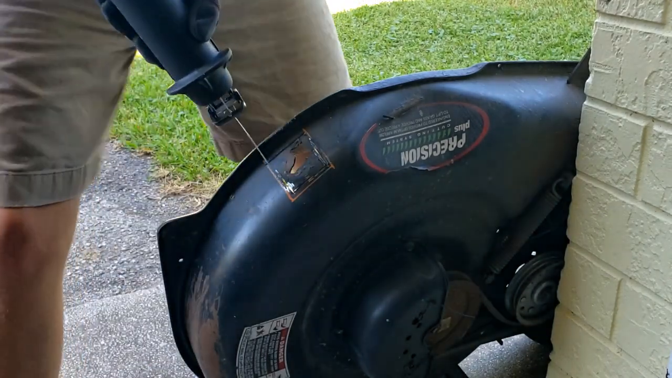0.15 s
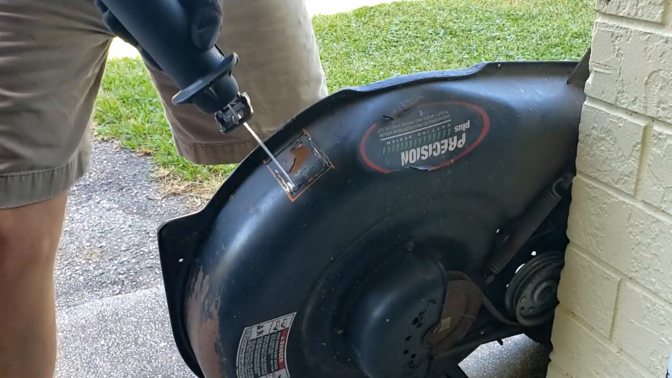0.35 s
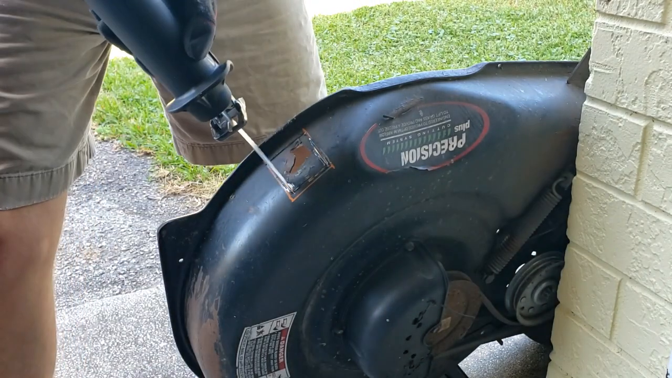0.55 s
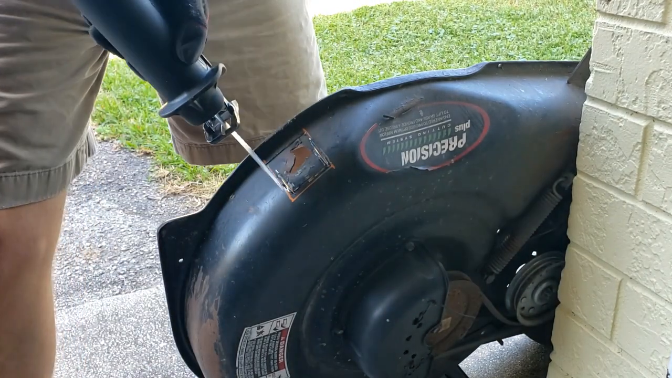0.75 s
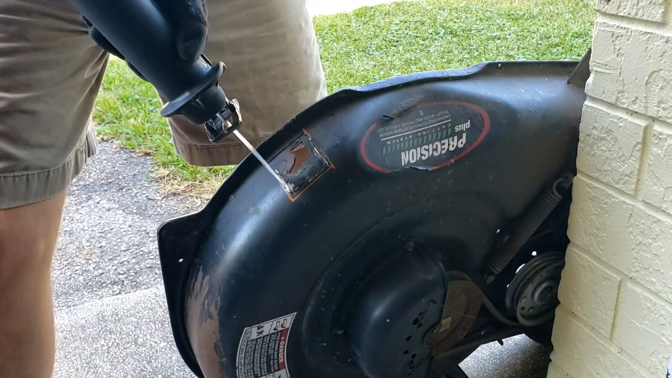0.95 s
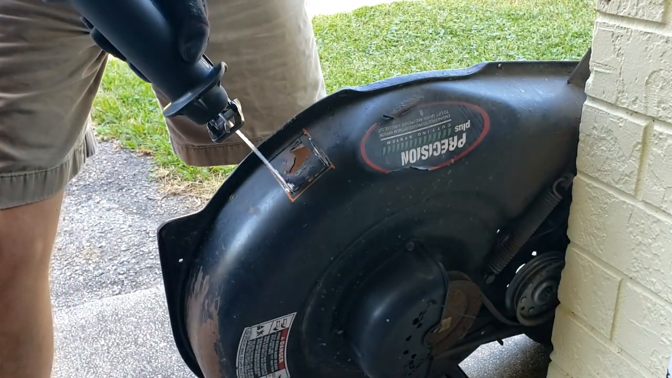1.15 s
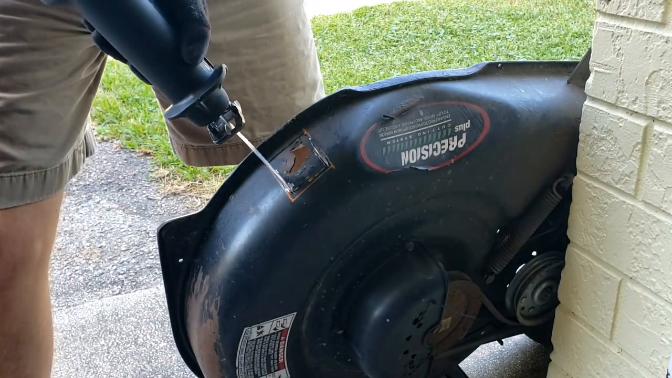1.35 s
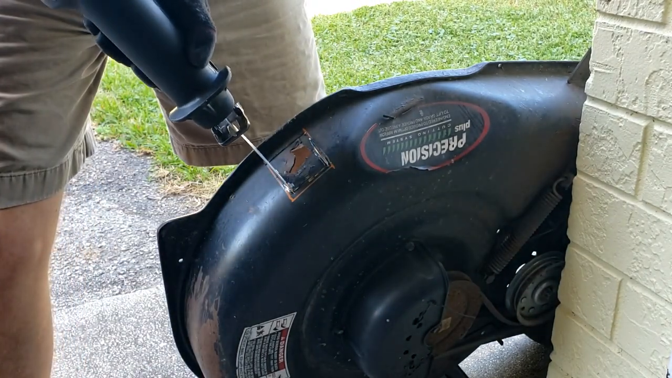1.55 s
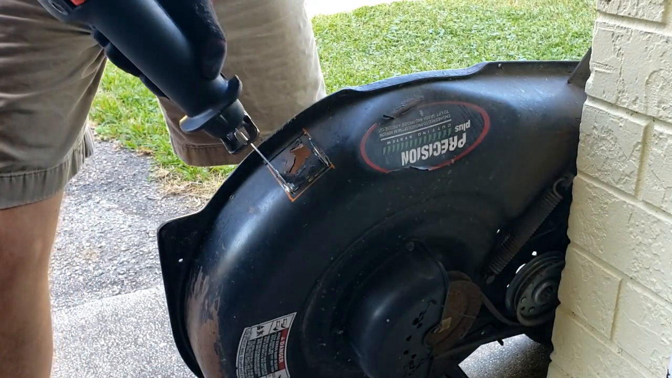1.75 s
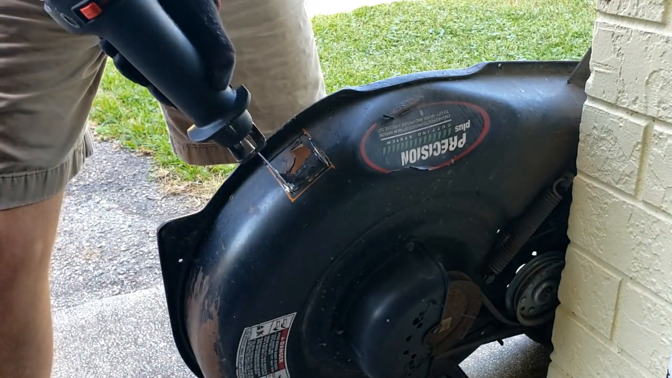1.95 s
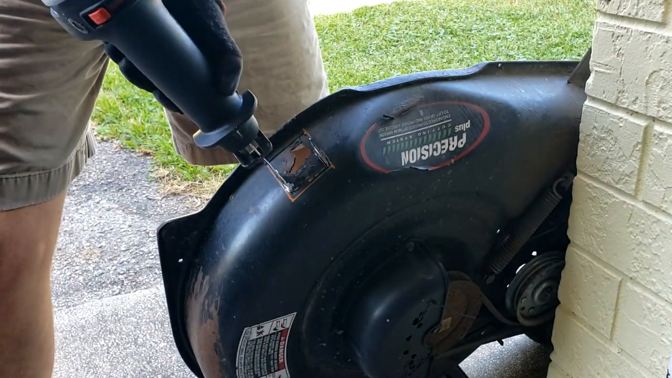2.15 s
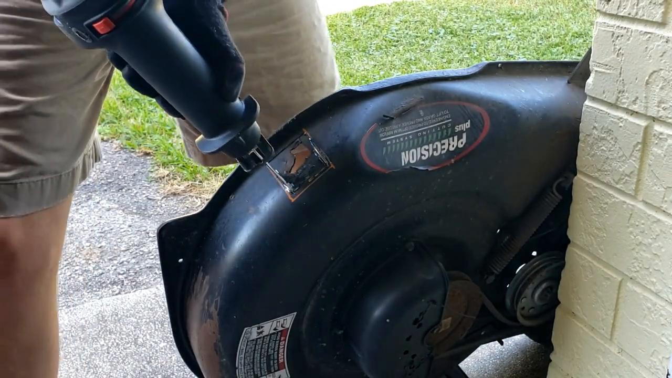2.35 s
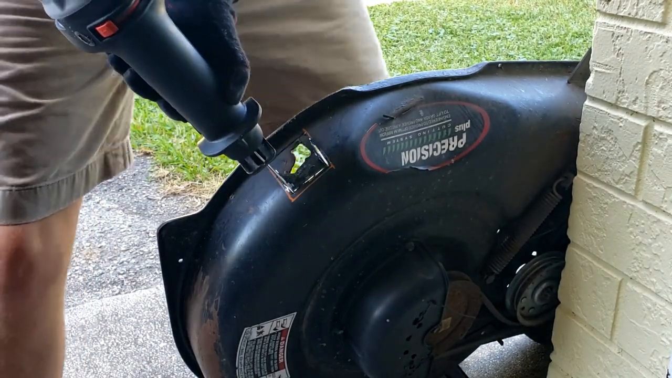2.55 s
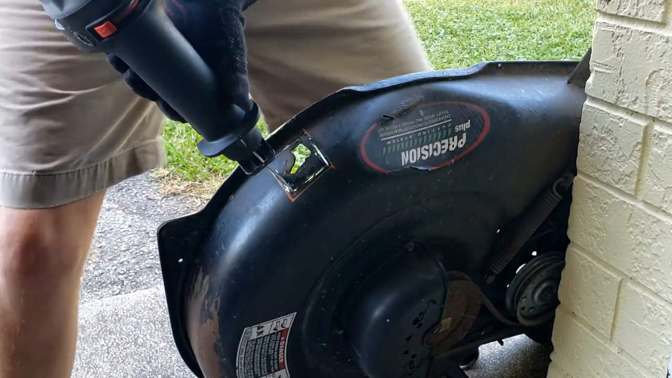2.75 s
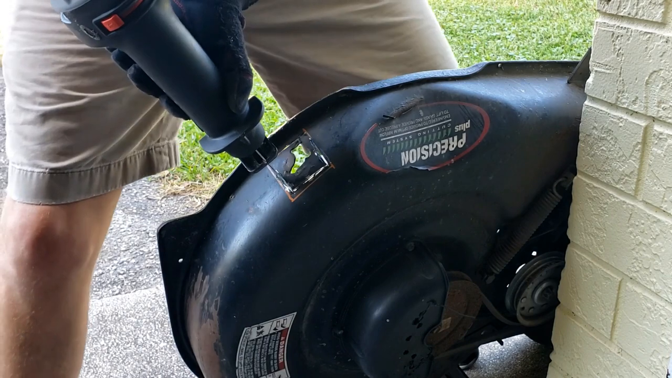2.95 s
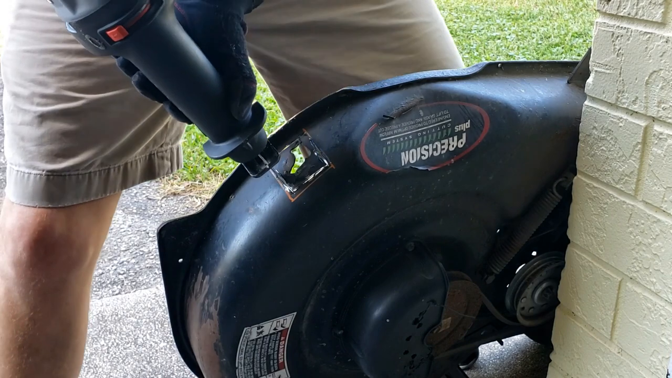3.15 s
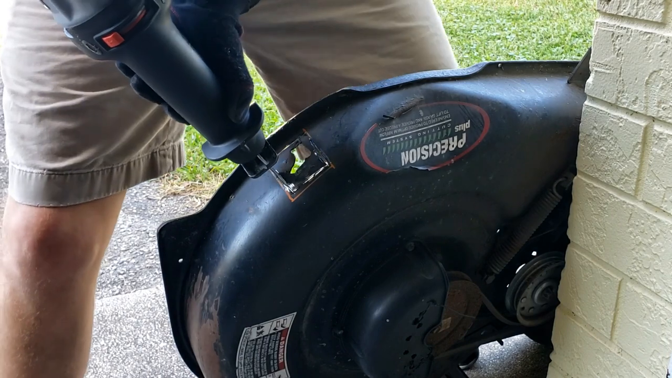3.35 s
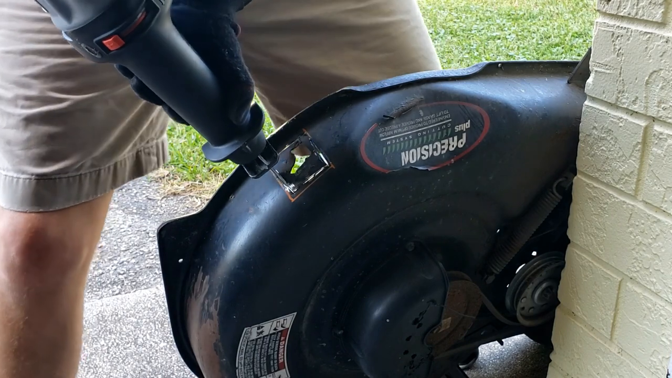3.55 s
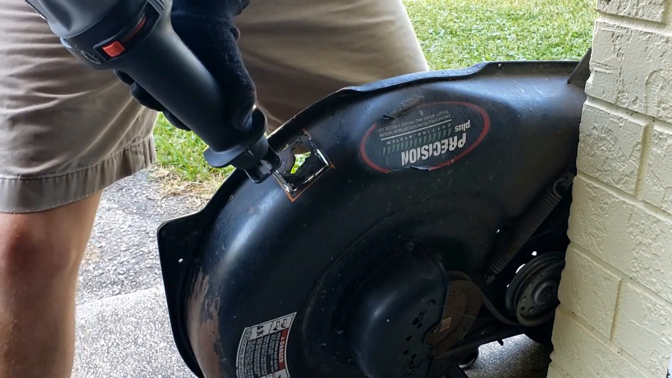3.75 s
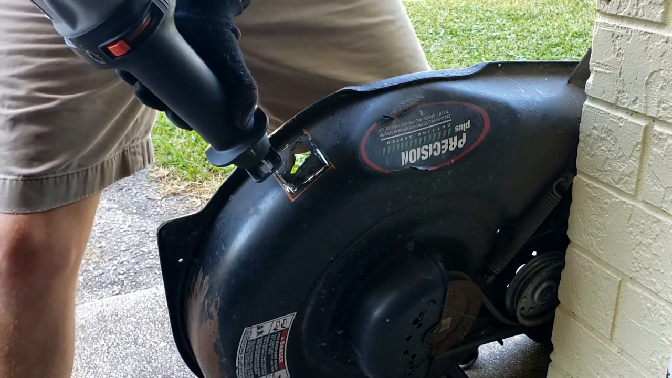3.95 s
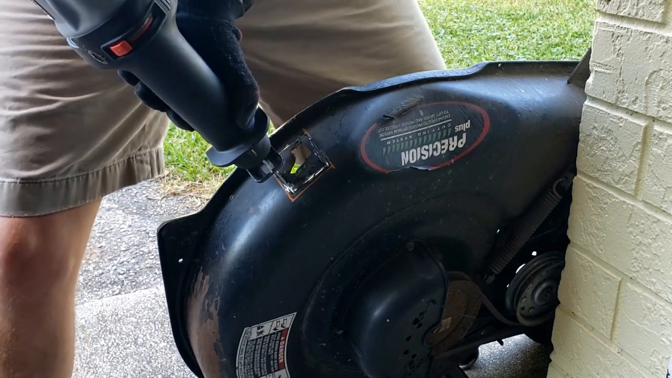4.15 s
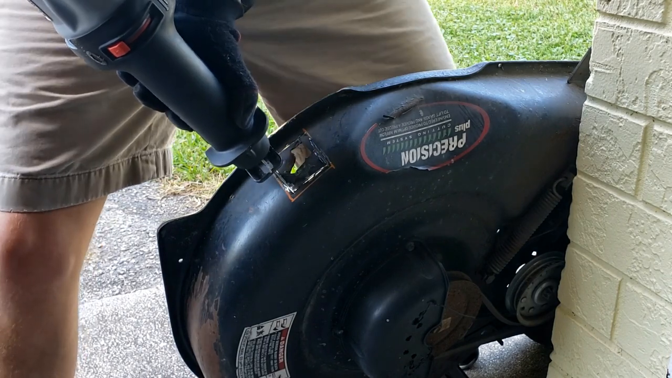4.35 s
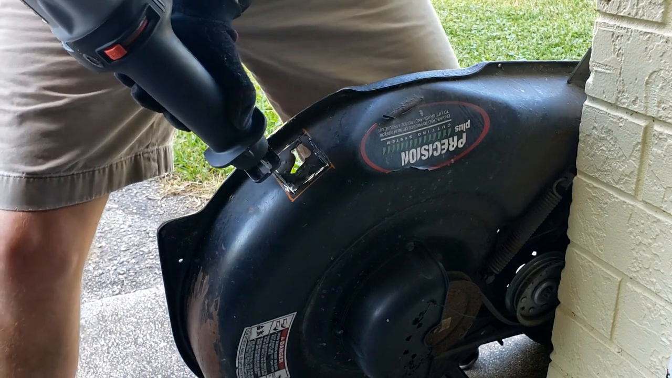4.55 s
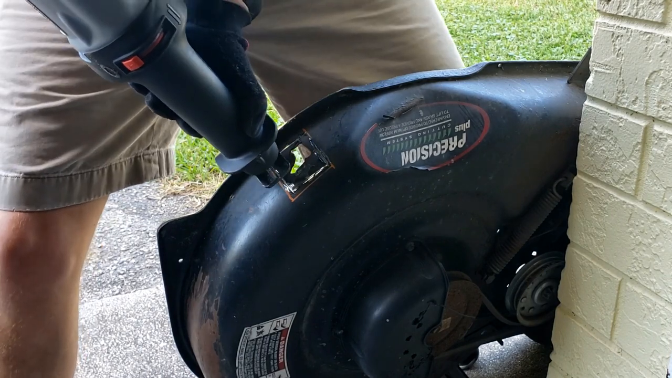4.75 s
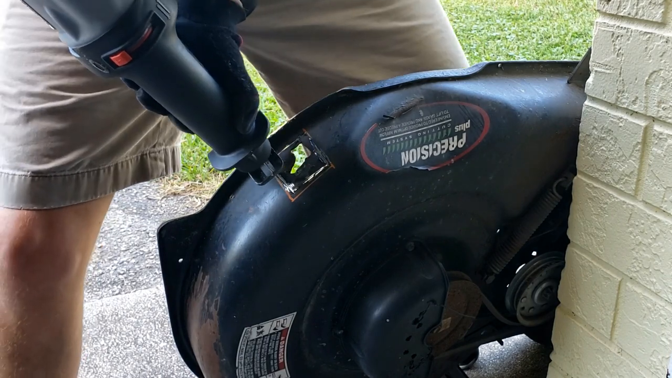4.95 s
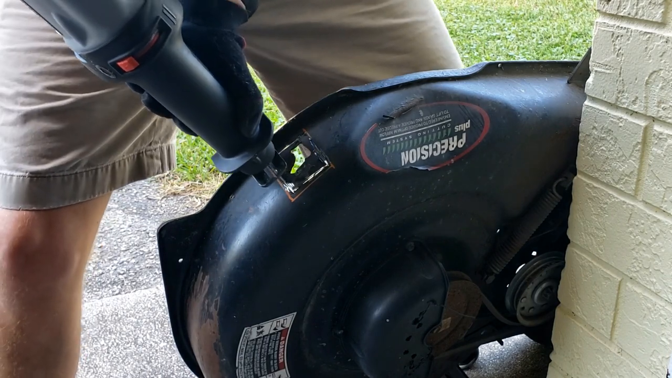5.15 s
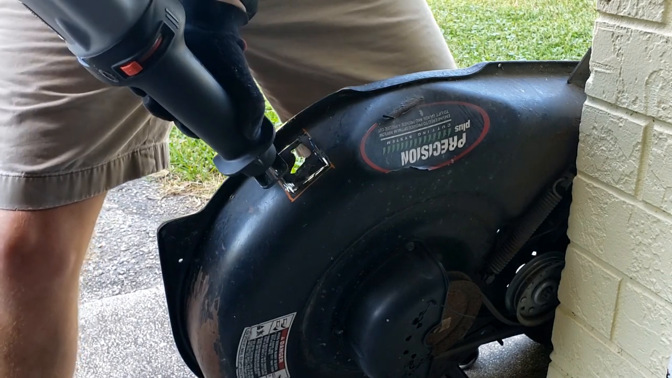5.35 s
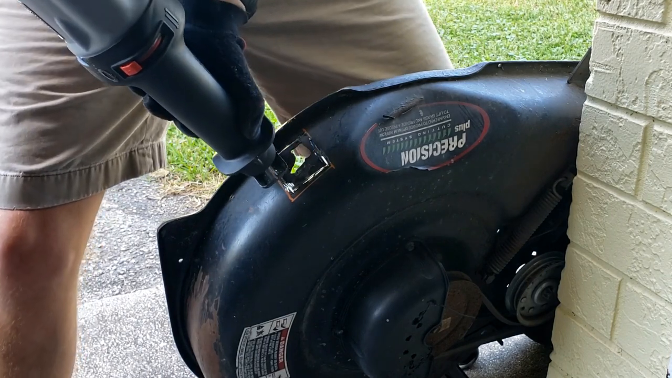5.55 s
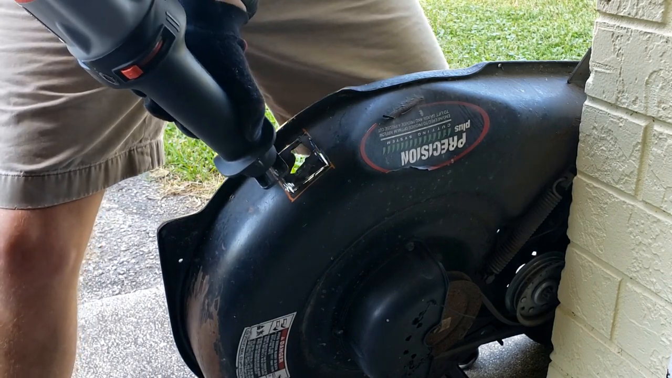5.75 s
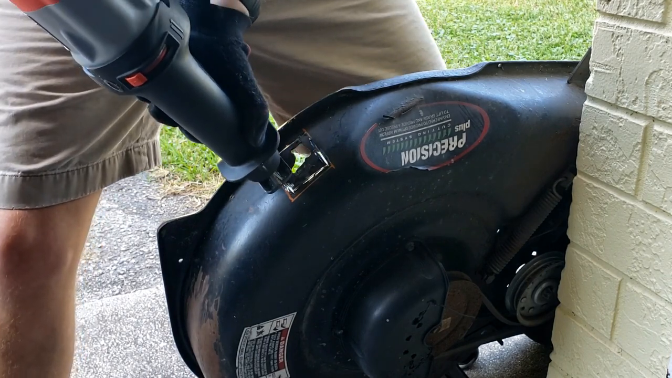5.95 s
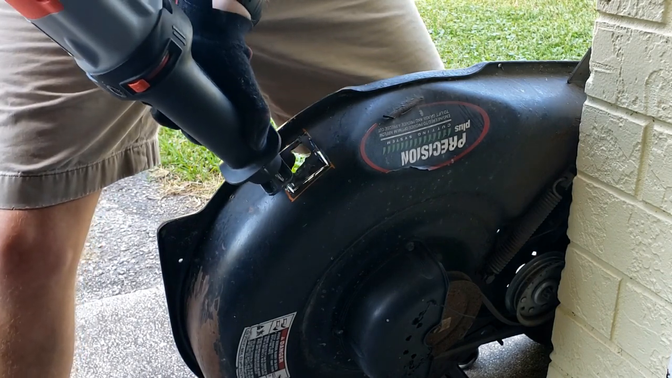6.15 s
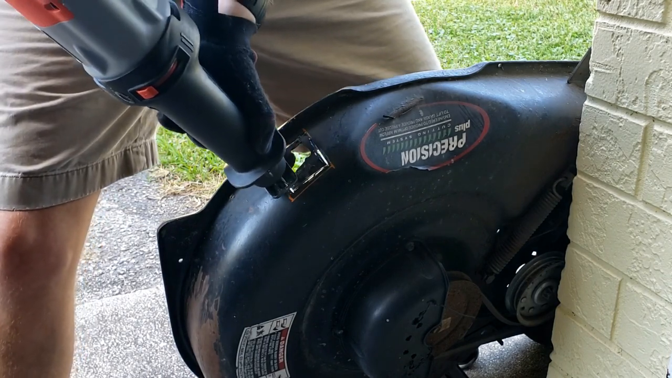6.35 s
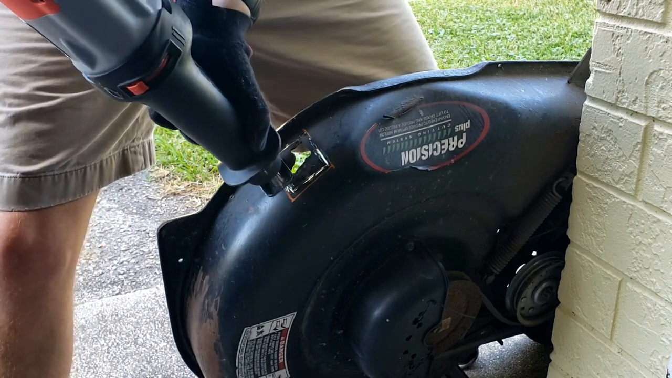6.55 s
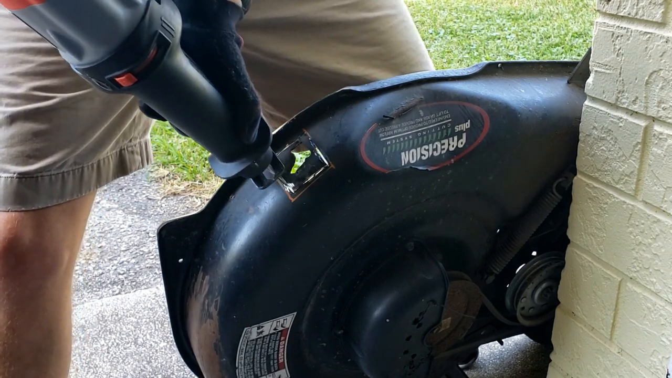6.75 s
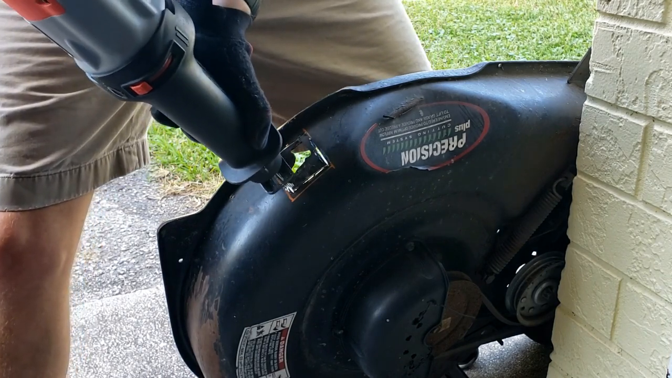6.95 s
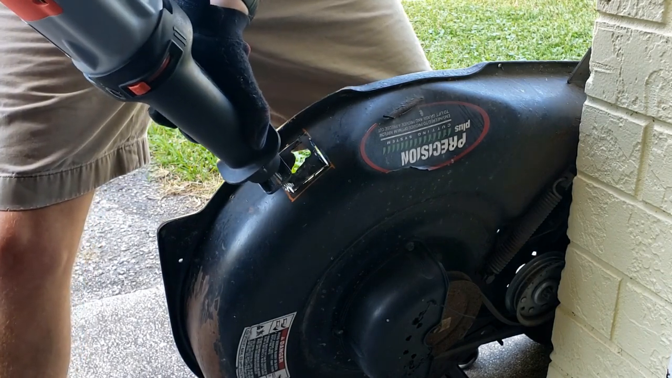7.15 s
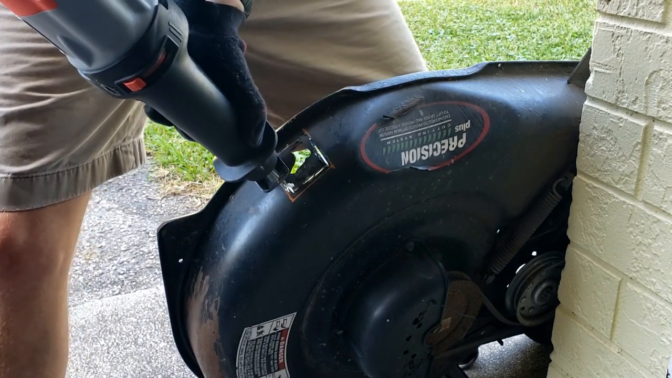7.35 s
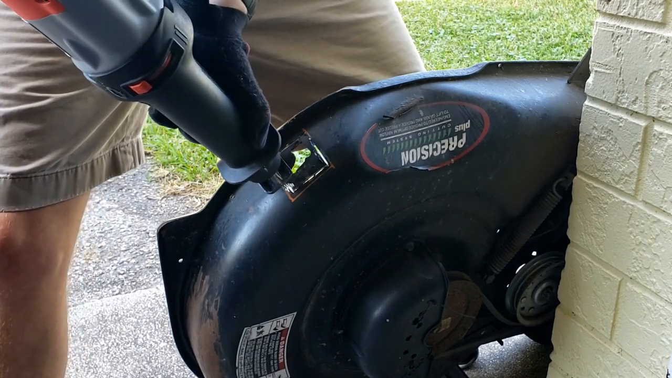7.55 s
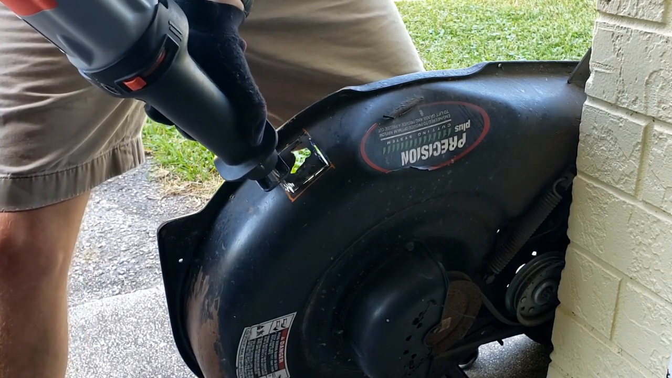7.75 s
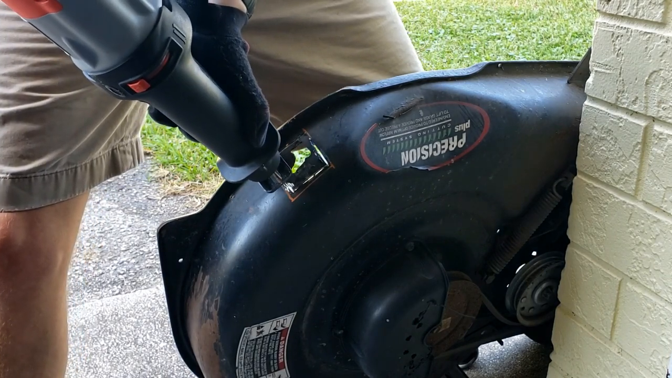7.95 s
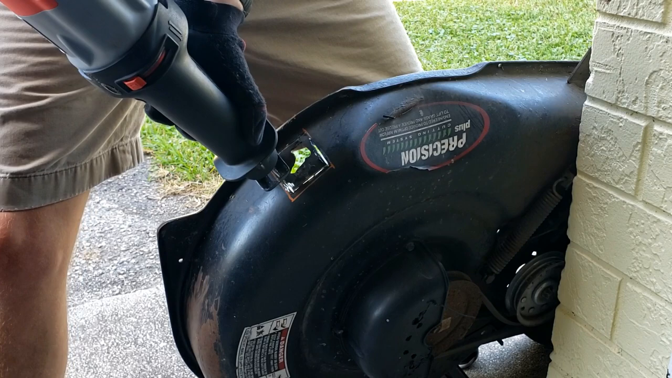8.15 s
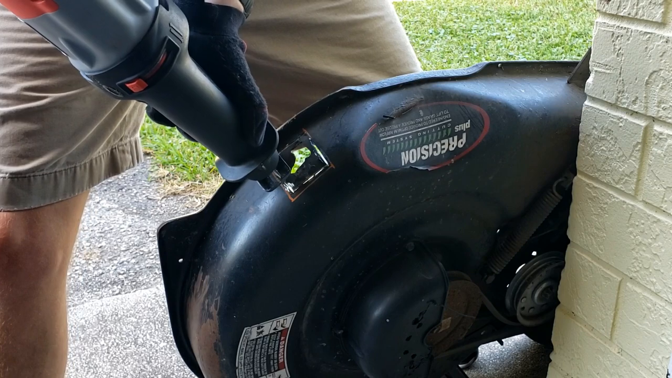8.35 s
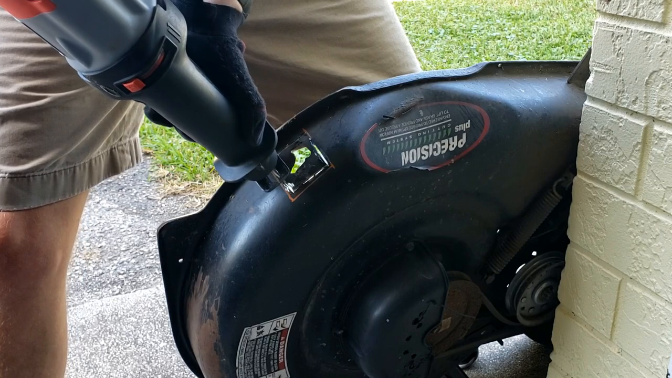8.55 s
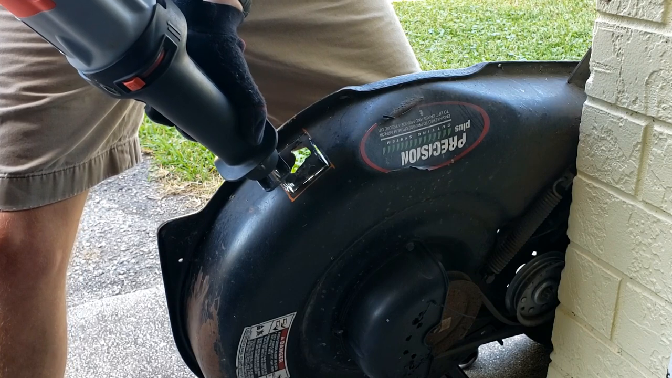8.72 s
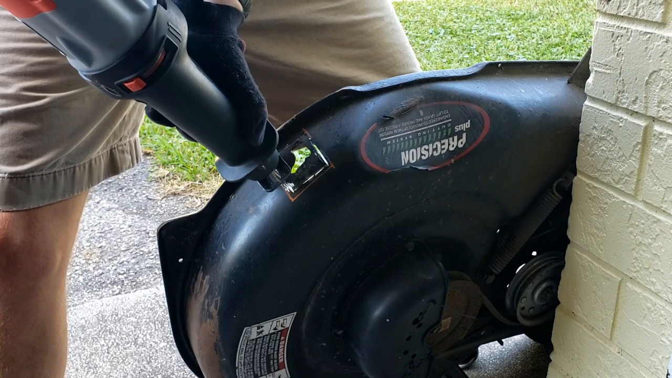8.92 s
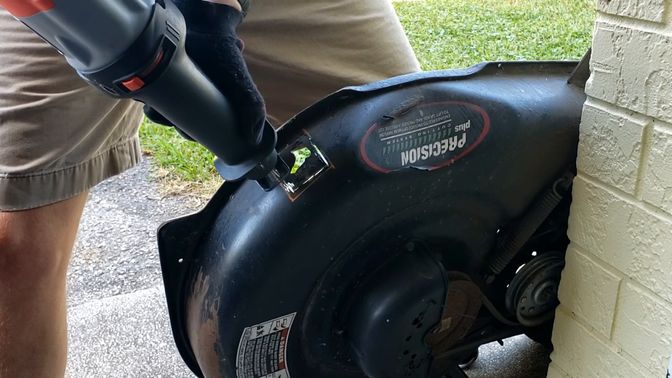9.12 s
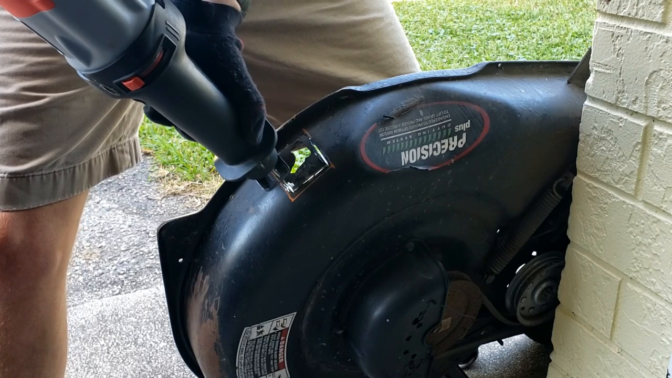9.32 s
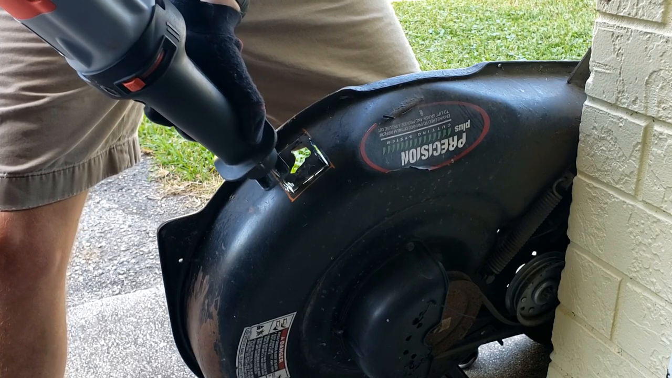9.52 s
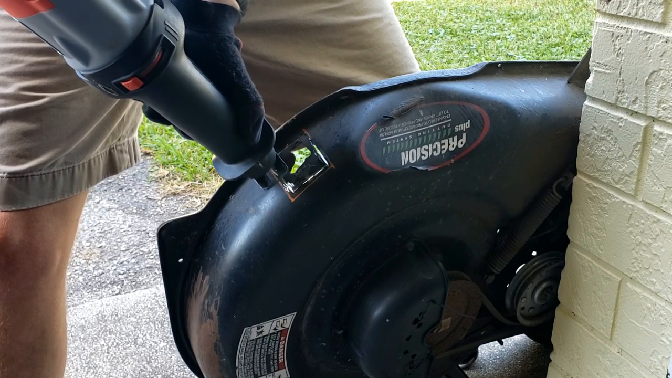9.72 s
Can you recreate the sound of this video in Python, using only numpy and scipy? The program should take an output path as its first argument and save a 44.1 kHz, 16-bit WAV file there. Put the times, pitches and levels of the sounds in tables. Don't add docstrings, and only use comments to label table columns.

```python
import sys
import numpy as np
from scipy import signal
from scipy.io import wavfile

SR = 44100
rng = np.random.default_rng(int(sys.argv[2]) if len(sys.argv) > 2 else 0)


def wav_out(sig):
    wavfile.write(sys.argv[1], SR, np.round(np.clip(np.atleast_2d(sig).T, -1, 1) * 32767).astype(np.int16))


def gain_from_decibels(decibels):
    exponent = np.asarray(decibels, float) / 20
    return 10 ** exponent


N = 435708

# start_s, bite_db, shoe_looseness_db
CUT = [(4.42, -83, -10), (4.52, -69, 12), (4.74, -56, 11), (4.83, -45.5, -3), (5.15, -37.5, 5),
       (5.74, -37.5, -5), (6.18, -46, -0.5), (6.36, -38.5, 1.5), (6.61, -54, -8), (6.78, -61.5, 10),
       (6.88, -78.5, 25.5), (7.37, -62, 4), (7.44, -43, 11.5), (7.57, -39, -14), (7.77, -37.5, 6.5),
       (7.9, -34.5, -6), (8.92, -34.5, -13), (9.88, -33.5, -4.5)]
# pitch_hz, likeness (0 to 1)
LIKENESS = [(100, .97), (500, .8), (1100, .85), (2200, .65), (8000, .2)]


def rms_one(x):
    return x / np.sqrt(np.mean(x ** 2) + 1e-20)


def in_time(rows, outside_db=-120):
    s, *columns = np.transpose(rows)
    t = np.arange(N) / SR
    return np.array([np.interp(t, s, column, outside_db, outside_db) for column in columns])


def at_hz(points, hz):
    table_hz, values = np.array(points).T[:2]
    return np.interp(np.log(hz), np.log(table_hz), values)


def band(x, low, high):
    return signal.sosfilt(signal.butter(2, [low, high], "band", fs=SR, output="sos"), x)


def drift(rate_hz):
    knots = rng.standard_normal(int(N / SR * 200))
    r = np.exp(-2 * np.pi * rate_hz / 200)
    smooth = rms_one(signal.lfilter([1], [1, -2 * r, r * r], knots))
    return np.interp(np.linspace(0, len(knots) - 1, N), np.arange(len(knots)), smooth)


def swells(rows, fade_db_per_s):
    rise_db, knee_db = 53, 23.5
    s, swell_s, *levels = np.transpose(rows)[..., None]
    t = np.arange(0, N + 64, 64) / SR
    curves = []
    for level_db, fade in zip(levels, np.broadcast_to(fade_db_per_s, len(levels))):
        away_db = np.maximum(rise_db * (s - t) / swell_s, fade * (t - s))
        loudest_db = np.max(level_db - away_db ** 2 / knee_db, axis=0)
        curves.append(np.interp(np.arange(N) / SR, t, loudest_db))
    return np.array(curves)


def pair(mid, side, alike):
    alike = np.clip(alike, 0, 1)
    return np.sqrt((1 + alike) / 2) * mid + np.sqrt((1 - alike) / 2) * side * np.array([[1], [-1]])


def stereo_noise(spectrum, edges, length, t60=None):
    out, t = 0, np.arange(length) / SR
    white = rng.standard_normal((2, 2, length))
    for k, (low, high) in enumerate(zip(edges, edges[1:])):
        hz = np.sqrt(low * high)
        fade = 1
        if t60 is not None:
            t60_s = at_hz(t60, hz)
            fade = gain_from_decibels(-60 * t / t60_s) / np.sqrt(t60_s)
        both_ports = pair(*band(white[k % 2], low, high), at_hz(LIKENESS, hz))
        out = out + gain_from_decibels(at_hz(spectrum, hz)) * fade * both_ports
    return rms_one(out)


def struck(modes, length):
    t, out = np.arange(length) / SR, 0
    for hz, level_db, t60_s in modes:
        turn, spot = rng.standard_normal(2)
        apart = np.tanh(turn) * np.arccos(np.clip(at_hz(LIKENESS, hz), 0, 1)) / 2
        ring = np.sin(2 * np.pi * hz * t + apart * np.array([[1], [-1]]))
        out = out + gain_from_decibels(level_db + 3.0 * spot - 60 * t / t60_s) / np.sqrt(t60_s) * ring
    return rms_one(out)


def drive(force, response):
    unit = response / np.sqrt(np.sum(response ** 2, 1, keepdims=True))
    return signal.oaconvolve(force[None], unit, axes=1)[:, :N]


def teeth(per_s, spread_db):
    sizes = gain_from_decibels(spread_db * np.minimum(rng.exponential(1, N), 5)) * rng.choice([-1, 1], N)
    return rms_one(sizes * (rng.random(N) < per_s / SR))


def jolts(events, rise_s, fall_s, late_s):
    s, peak_db, low_db, bright_db = np.transpose(events)
    build_s = .04
    t = np.arange(SR // 8) / SR - build_s
    stretch = np.where(t < 0, [[1.5], [1.01], [.8]], [[1.5], [1.01], [1.4]])
    t = t / stretch
    shape = 1 / (np.exp(np.minimum(-t / rise_s, 50)) + np.exp(t / fall_s))
    marks = np.zeros((3, N))
    starts = ((s + late_s - build_s) * SR).astype(int)
    marks[:, starts] = gain_from_decibels(peak_db + np.array([low_db, 0 * s, bright_db]))
    return np.abs(signal.oaconvolve(marks, shape / shape.max(), axes=1)[:, :N])


def shell(envelope, modes, dense_db, wander_db, count):
    # pitch_hz, level_db (per Hz)
    crowd = [(94, -75), (160, -15), (400, -3), (860, -18), (1090, -26), (1450, -13.5), (1900, -15.5),
             (2570, -14.5), (3630, -7), (5500, -18), (7000, -22.5), (9600, -21), (13000, -22.5),
             (16000, -22.5)]
    # pitch_hz, t60_s
    crowd_t60 = [(160, 0.027), (1000, 0.23), (4000, 0.1), (15000, 0.074)]
    edges_hz = [150, 700, 2500, 16500]
    rightward_db = [-0.2, 0.94, 1.7]
    out, length = 0, SR // 2
    thirds_hz = 140 * 2 ** np.arange(0, 7.1, 1 / 3)
    for spot in range(count):
        body = struck(modes, length) + gain_from_decibels(dense_db) * stereo_noise(crowd, thirds_hz, length, crowd_t60)
        forces = envelope * teeth(per_s=5000, spread_db=3.0)
        for force, low, high, pan_db in zip(forces, edges_hz, edges_hz[1:], rightward_db):
            response = band(band(body, low, high), low, high)
            sound = drive(force * gain_from_decibels(wander_db * drift(9.0)), response)
            out = out + gain_from_decibels(pan_db * np.array([[-1], [1]])) * sound
    return out / np.sqrt(count)


def surroundings():
    # nearest_s, swell_s, level_db
    passes = [(.45, 3, -50.5), (1.98, 6.3, -54), (3.0, 9.4, -54), (3.96, 4.5, -55.5), (4.8, 1.4, -51),
              (5.53, 0.66, -59.5), (6.95, 0.35, -48), (7.5, 2.8, -48), (8.3, 3.7, -51.5),
              (9.19, 1.3, -42.5)]
    # fullest_s, swell_s, level_db
    presses = [(0, 0.086, -57), (1.26, 0.6, -54), (2.15, 2.5, -59), (3.44, 2.5, -62.5), (5.23, 1.27, -45),
               (5.75, 0.97, -50), (6.35, 1.1, -51.5), (6.8, 0.82, -55), (7.46, 1.9, -54.5),
               (8.86, 1, -51.5), (9.88, 1.1, -47)]
    # fullest_s, swell_s, level_db
    puffs = [
        (1.13, 0.1, -39),
        (1.24, 0.3, -43.5),
    ]
    # start_s, peak_db
    shifts = [
        (0.055, -33),
        (0.107, -34),
        (4.95, -24),
        (5.071, -18),
        (6.736, -23.5),
        (6.95, -26),
        (7.064, -25.5),
        (8.281, -21),
        (8.658, -17),
    ]
    # pitch_hz, level_db (per Hz)
    air_spectrum = [(200, -33), (350, -24), (700, -32), (2500, -37), (7000, -48.5), (10500, -32.5),
                    (13000, -46), (16000, -35)]
    white, t = rng.standard_normal((4, 2, N)), np.arange(N) / SR

    rumble_db = np.maximum(swells(passes, 31), -65)
    rumble = gain_from_decibels(rumble_db + 1.5 * drift(5)) * pair(*rms_one(band(white[0], 45, 80)), .45)
    thud_db = np.maximum(swells(presses, 58), -64)
    thud = gain_from_decibels(thud_db + 1 + 2 * drift(12)) * pair(*rms_one(band(white[1], 75, 200)), .95)
    wind = rms_one(band(band(white[2], 30, 274), 34, 280))
    gust = gain_from_decibels(swells(puffs, 146) + 3.9 * drift(30)) * pair(*wind, 0.91)
    shift = sum(gain_from_decibels(peak_db - 9.0 - 60 * np.maximum(t - s, 0) / 0.12) * (t > s) for s, peak_db in shifts)
    ground = shift * pair(*rms_one(band(white[3], 75, 330)), 0.93)
    air = gain_from_decibels(-73.5) * stereo_noise(air_spectrum, 200 * 2 ** np.arange(0, 6.4, 1 / 3), N)
    return rumble + thud + gust + ground + air


def motor():
    # start_s, whine_hz, whine_db, buzz_db
    spells = [
        [(4.45, 420, -88, -104), (4.47, 480, -56, -60), (4.54, 800, -56, -50.5), (4.6, 1150, -45.5, -55),
         (4.63, 1200, -43, -49), (4.67, 1190, -34, -55), (4.72, 1200, -35.5, -48), (4.78, 1230, -47, -56),
         (4.9, 1190, -80, -78)],
        [(6.74, 1450, -54, -87), (6.82, 1290, -49, -100), (6.9, 950, -53, -100), (7.0, 640, -62, -85),
         (7.08, 640, -46, -82), (7.15, 770, -50, -69), (7.21, 980, -62, -69), (7.28, 1100, -40, -79),
         (7.38, 1150, -54, -66)],
    ]
    # multiple of 120 Hz, level_db
    harmonics = [(2, 1), (4, 4), (5, 4), (6, -16), (10, -18), (14, -8.5), (19, -9)]
    out, t = 0, np.arange(N) / SR
    buzz = 0
    for k, level_db in harmonics:
        buzz = buzz + gain_from_decibels(level_db + 2.3 * drift(4.7)) * np.sin(2 * np.pi * 120 * k * t + k * k)
    whirr = rms_one(band(rng.standard_normal((2, N)), 580, 1520))
    for rows in spells:
        hz, whine_db, buzz_db = in_time(rows)
        whine = np.sin(2 * np.pi * np.cumsum(hz * (1 + .035 * drift(60))) / SR)
        out = out + gain_from_decibels(whine_db + 1.5 + 4 * drift(25)) * whine
        out = out + gain_from_decibels(whine_db - 1.5) * whirr + gain_from_decibels(buzz_db) * buzz
    return out


def handling():
    # fullest_s, swell_s, hum_db, ring_db, scrape_db
    drags = [(.12, 0.11, -80, -72, -88), (.65, 0.076, -68.5, -69, -81), (1.24, 0.25, -56.5, -53.5, -69),
             (1.36, 0.35, -66, -65, -70), (1.49, 0.12, -55.5, -63, -77), (1.68, 0.065, -51.5, -61.5, -73),
             (1.81, 0.45, -52, -59.5, -75), (1.97, 1, -66, -66, -83), (2.25, 0.2, -39, -62.5, -79),
             (2.39, 0.65, -47.5, -63, -79), (2.66, 0.1, -45, -60, -71.5), (3.18, 0.27, -53.5, -54.5, -65.5),
             (3.29, 0.59, -58, -58.5, -76), (3.44, 0.042, -51.5, -69, -85), (3.47, 0.057, -59, -57.5, -72),
             (3.62, .06, -70, -71, -87), (3.72, 0.078, -70, -58.5, -98), (3.99, 0.078, -59, -54, -70),
             (4.09, 0.62, -64, -63, -79)]
    drag_fades = [192, 245, 193]
    # start_s, peak_db, low_share_db, bright_share_db
    edge_taps = [(0.655, -57, -8, -10), (1.203, -48, -7, -4), (1.22, -35.5, -7, 0.5), (1.267, -54, -2, -11),
                 (1.302, -43, -13, 5), (1.342, -47, -6, 6), (1.655, -42, -12, -23), (1.78, -32, -25, -9.5),
                 (2.094, -53, -8, 4), (2.176, -43, -10, -8), (2.365, -50, -8, 0), (3.075, -50, -10, 2),
                 (3.179, -41, -8, 2), (3.427, -57.5, 13, -5), (3.465, -32.5, -6, -2), (3.618, -54, -10, 7),
                 (3.987, -53, -10, -10), (4.005, -40, -10, -7), (4.06, -38, -4, -2)]
    # start_s, peak_db, low_share_db, bright_share_db
    wedged_knocks = [
        (0.054, -53, -29, -5),
        (0.111, -58, -5, -22),
        (2.645, -43, 7.5, -2),
        (3.707, -45, -7, -8),
    ]
    # pitch_hz, level_db, t60_s
    free_modes = [(1100, -21, 0.15), (1128, 2.5, 0.2), (1170, 1.5, 0.23), (1200, 7.5, 0.084),
                  (1275, 0, 0.075), (1660, -1, 0.11), (1770, -4.5, 0.092), (2080, -3, 0.085),
                  (2250, -12, 0.18), (2750, -18, .15), (2940, 4, 0.14), (3100, -11, .15), (3560, -17, .1),
                  (4050, -28, 0.11), (5520, -4.5, 0.11)]
    # pitch_hz, level_db, t60_s
    wedged_modes = [(494, 10, 0.17), (476, -6, 0.3), (770, -4, 0.18), (1224, -10, 0.25), (1420, -19, 0.12),
                    (1730, -14, 0.15), (1850, -10, .15)]

    hum_db, ring_db, scrape_db = swells(drags, drag_fades)
    scrape = gain_from_decibels(np.array([ring_db - 1, ring_db, scrape_db + 6.0]))
    taps = gain_from_decibels(-12.5) * jolts(edge_taps, rise_s=0.0003, fall_s=0.0063, late_s=-0.00043)
    free = shell(np.hypot(scrape, taps), free_modes, dense_db=-3.0, wander_db=-4.5, count=2)

    hum_hz, t = 434, np.arange(N) / SR
    hum = gain_from_decibels(hum_db + 3 + drift(8)) * np.sin(2 * np.pi * hum_hz * t + .5 * drift(5))

    knocks = gain_from_decibels(-5) * jolts(wedged_knocks, rise_s=0.002, fall_s=0.016, late_s=-0.0071)
    dull = shell(knocks, wedged_modes, dense_db=-11.0, wander_db=0, count=1)
    blow = jolts(wedged_knocks, rise_s=.00005, fall_s=.0001, late_s=.006)[0]
    bong = gain_from_decibels(3.0) * drive(blow, struck(wedged_modes, SR // 2))
    return free + hum + bong + dull


def blade():
    # start_s, peak_db, pitch_hz, t60_s
    twangs = [
        (1.862, -32, 11250, .25),
        (1.887, -39, 9650, .1),
        (1.911, -41, 9350, .1),
        (1.937, -40, 9400, .2),
        (3.617, -49, 7550, .18),
        (3.617, -51, 5520, .18),
        (1.343, -57, 10050, .2),
        (1.343, -58, 11000, .1),
        (3.7, -62, 10500, .08),
    ]
    out, t = np.zeros(N), np.arange(SR // 4) / SR
    for s, peak_db, hz, t60_s in twangs:
        narrow, wide = rng.standard_normal((2, len(t)))
        ring = np.sin(2 * np.pi * hz * t) + 0.7 * rms_one(band(narrow, hz * .97, hz * 1.03))
        rattle = gain_from_decibels(-17 - 60 * t / 0.23) * band(wide, 2600, 16000)
        attack = 1 - np.exp(-t / 0.00017)
        out[int(s * SR):][:len(t)] += gain_from_decibels(peak_db) * attack * (gain_from_decibels(-60 * t / t60_s) * ring + rattle)
    return out


def drone():
    # start_s, pitch_hz, level_db
    loose = [(4.78, 455, -54), (4.82, 442.6, -35.5), (4.87, 448, -38), (4.895, 452, -62), (4.96, 448, -32),
             (5.03, 437.7, -38.5), (5.148, 435, -32), (5.35, 436, -47)]
    # fullest_s, swell_s, level_db
    wakes = [(5.75, .1, -39.5), (6.05, 2.5, -46), (6.3, 0.47, -34.5), (6.55, 1.4, -41),
             (6.736, 0.053, -24.5), (7.76, 0.26, -35), (8.1, 1.7, -38.5), (8.45, 3.7, -40.5),
             (8.65, 0.036, -34.5), (9.27, 1.44, -36), (9.77, 0.089, -39.5)]
    out, t = 0, np.arange(N) / SR
    starved_db = 0.89 * np.minimum(in_time(CUT)[0] + 47, 0)
    pressed_hz = 391 - 8.8 * np.maximum(t - 7.3, 0)
    pressed_db = swells(wakes, 65)[0]
    for hz, level_db in [in_time(loose), (pressed_hz, pressed_db)]:
        waver = gain_from_decibels(2.2 * drift(14)) * np.sin(2 * np.pi * np.cumsum(hz) / SR + .45 * drift(10))
        out = out + gain_from_decibels(level_db + starved_db + 6.0) * waver
    return out


def snag_rows(loose_db):
    # start_s, pull_peak_db, return_peak_db
    first_go = [(4.631, -37, -45), (4.669, -30, -45), (4.79, -24.5, -42), (4.821, -16.5, -44),
                (4.914, -12.5, -36), (5.016, -15.5, -8.5), (5.128, -40, -45), (5.199, -2, -13.5),
                (5.32, -0.5, -38), (5.427, 1.5, -35), (5.539, -14, -22), (5.632, 4.5, -19),
                (5.743, -51, -17), (5.837, 1, -16), (5.945, -36, -19.5), (6.059, -40, -23),
                (6.158, -20, -14.5), (6.256, -1.5, -22), (6.364, 0.5, -41), (6.49, -21.5, -32.5),
                (6.59, -42, -58), (6.717, -26, -62), (6.947, -37.5, -53), (7.062, -35.5, -61)]
    # start_s, pull_peak_db, return_peak_db
    second_go = [(7.371, -31, -31), (7.405, -10.5, -21), (7.522, -4.5, -41), (7.696, -7.5, -20),
                 (7.759, -3, -4.5), (7.879, 1.5, -6), (7.993, 0.5, -3.5), (8.104, 1.3, -11),
                 (8.213, 2, -2.5), (8.319, 1, -5), (8.422, 2, -15), (8.53, -0.5, -30), (8.638, 0, -3),
                 (8.739, 1.4, -11), (8.843, 2.1, -29), (8.945, -1, -33), (9.048, -2, -62),
                 (9.158, -1.5, -9.5), (9.257, 0, -37), (9.362, -1.5, -30), (9.469, -5, -17),
                 (9.574, -5, -22), (9.684, -6.5, -14.5), (9.796, -10, -12.5)]
    back_share = [0.429, 0.507]
    snag_low_db = [-16.5, -18.5]
    rows = []
    for go, share, low_db in zip([first_go, second_go], back_share, snag_low_db):
        s, pull_db, back_db = np.transpose(go)
        gap_s = np.diff(s)
        back_s = s + share * np.append(gap_s, gap_s[-1])
        for starts, peaks_db, bright_db in [(s, pull_db, -11.5), (back_s, back_db, -10)]:
            for start, peak_db in zip(starts, peaks_db):
                rows.append((start, peak_db, low_db + 0.86 * loose_db[int(start * SR)], bright_db))
    return rows


def cutting():
    # start_s, peak_db, low_share_db, bright_share_db
    judders = [
        (4.848, -17, -28, -16),
        (4.936, -20, -27, -5),
        (4.966, -21, -10, -28),
        (6.535, -29, -34, -26),
        (6.704, -33, -2, -11),
        (6.73, -24, -1.5, -11),
        (6.751, -34, -7, -4),
        (6.775, -42, -3, -18.5),
        (7.085, -35, -8, -14),
        (7.424, -19.5, -7, -21),
    ]
    # pitch_hz, level_db, t60_s
    shell_modes = [(310.6, -6.5, 0.37), (465, -6.5, 0.35), (529.4, -6.5, 0.14), (760, -13.5, 0.63),
                   (810, -15, 0.35), (973, -6, 0.28), (1039, -4.5, 0.1), (1078.4, -0.5, 0.18),
                   (1122.4, 1, 0.08), (1185, -13, 0.17), (1280, -21, 0.51), (1316, -20.5, 0.19),
                   (1697.3, 0.5, 0.13), (1789, -13, 0.22), (2176, -15.5, 0.17), (2233, -11, 0.11),
                   (2820, -6.5, 0.089), (2998, -4, 0.11), (3233, 0, 0.02), (3690, -8.5, 0.13),
                   (4218, -5.5, 0.1), (4243, -21.5, 0.049), (5060, -7.5, 0.21), (5325, -10, 0.092),
                   (5515, -10, 0.07), (6810, -22.5, 0.048)]
    # pitch_hz, level_db, t60_s
    shoe_modes = [(3590, 8.5, 0.051), (3760, -12, .08), (7097, -4, 0.039)]
    # pitch_hz, level_db, t60_s
    stiff_modes = [(526.6, -8, 0.27), (1133, 2, .17), (1190, -6, 0.14), (1284, -12.5, 0.2),
                   (1684, -8.5, 0.27)]

    bite_db, loose_db = in_time(CUT)
    ring_db = np.minimum(bite_db + 9, -27)
    regions_db = np.array([bite_db + loose_db, ring_db, bite_db])
    rasp = gain_from_decibels(regions_db + np.array([[0.1], [0.1], [5.5]]) + 4.4 * drift(55.0))
    snags = gain_from_decibels(-5.5) * jolts(snag_rows(loose_db) + judders, rise_s=0.0037, fall_s=0.0061, late_s=0.003)
    hiss = gain_from_decibels(-7.5) * rasp[2] * rms_one(band(rng.standard_normal((2, N)), 5400, 16300))
    slap = gain_from_decibels(-4.5) * drive(snags[2] * teeth(per_s=5100, spread_db=3.0), struck(shoe_modes, SR // 8))

    load = np.hypot(rasp, snags)
    cut_s = np.maximum(np.arange(N) / SR - 4.39, 0)
    stiff_force = gain_from_decibels(0.5 - 2.5 * cut_s) * load[1] * teeth(per_s=5000, spread_db=3.0)
    stiff = drive(stiff_force, band(struck(stiff_modes, SR // 4), 350, 2500))
    load[1] *= gain_from_decibels(-5 * np.exp(-cut_s / 0.82))
    return stiff + shell(load, shell_modes, dense_db=-1.5, wander_db=3.0, count=4) + hiss + slap


def later(x, lag):
    return np.concatenate([np.zeros(x.shape[:-1] + (lag,)), x[..., :-lag]], axis=-1)


def scene():
    near = cutting() + handling() + drone() + motor() + blade()
    low = signal.sosfilt(signal.butter(1, 3500, fs=SR, output="sos"), near[0])
    near[0] = later(low, 4) + later(near[0] - low, 6)
    return near + surroundings()


def band_limit(x):
    return signal.sosfilt(signal.butter(12, 15730, fs=SR, output="sos"), x)


def record(dry):
    dipped = dry - .5 * band(dry, 6670, 10020)
    rounded = 1.059 * np.tanh(dipped / 1.614)
    mix = signal.sosfilt(signal.cheby2(12, 50, 16500, fs=SR, output="sos"), rounded)
    return band_limit(mix)


dry = scene()
out = record(dry)
wav_out(out)
```